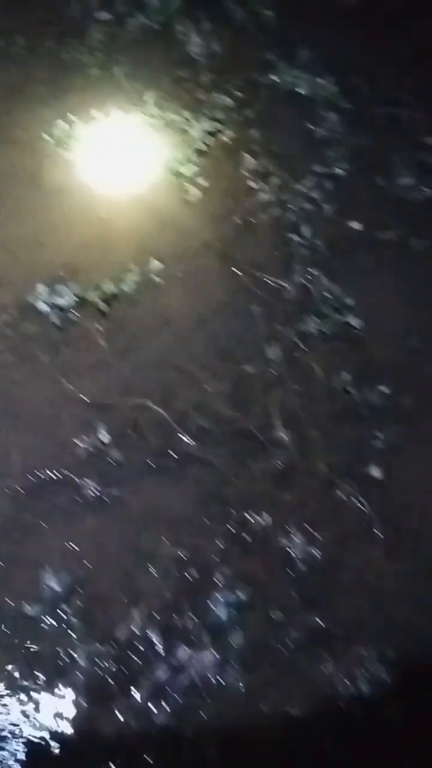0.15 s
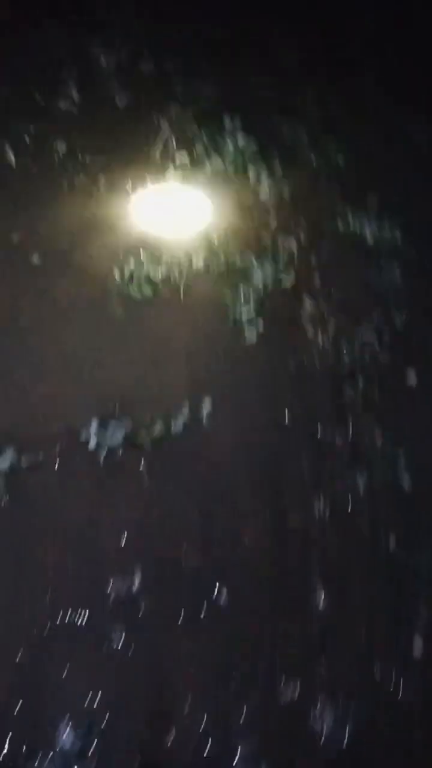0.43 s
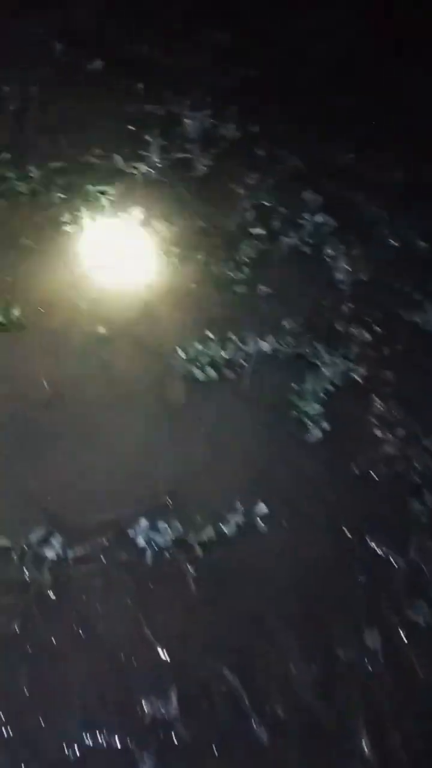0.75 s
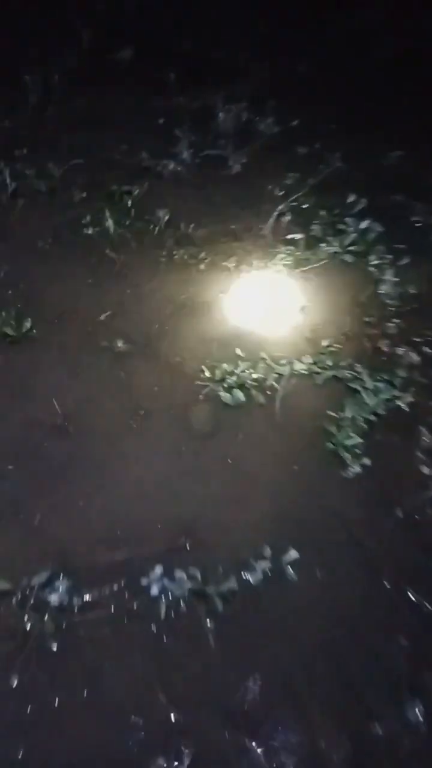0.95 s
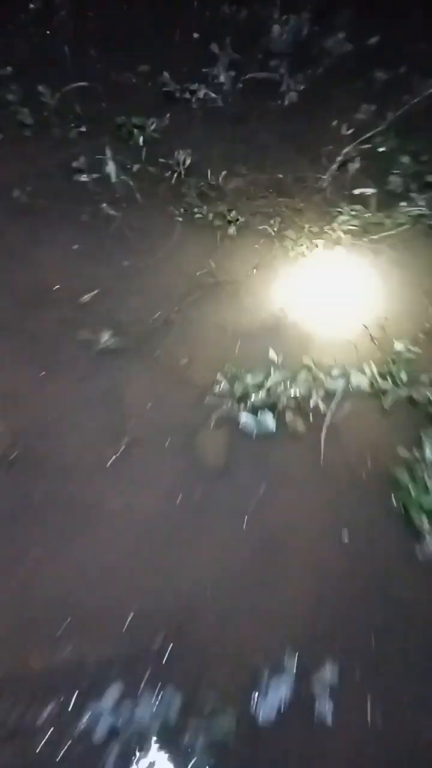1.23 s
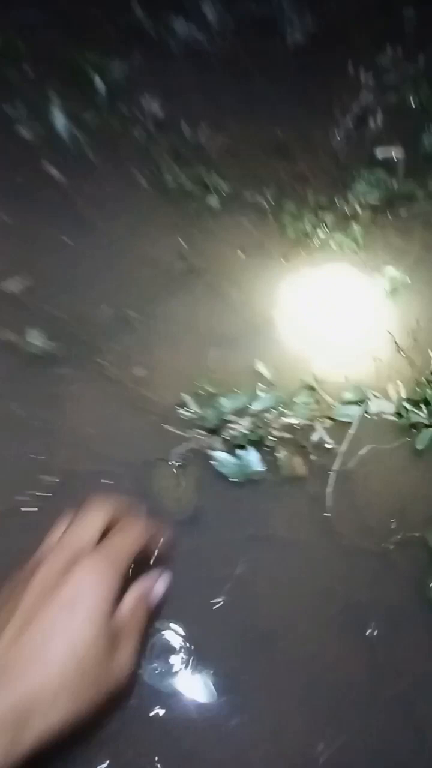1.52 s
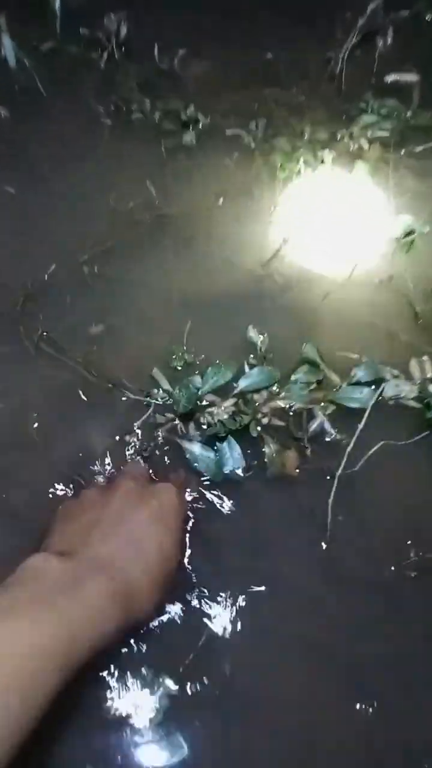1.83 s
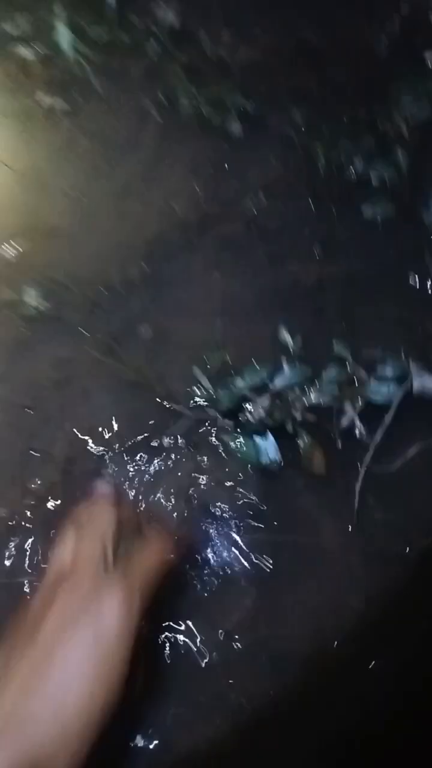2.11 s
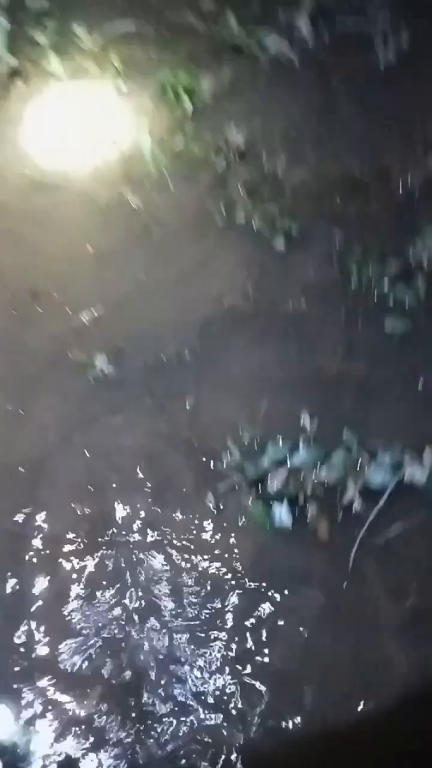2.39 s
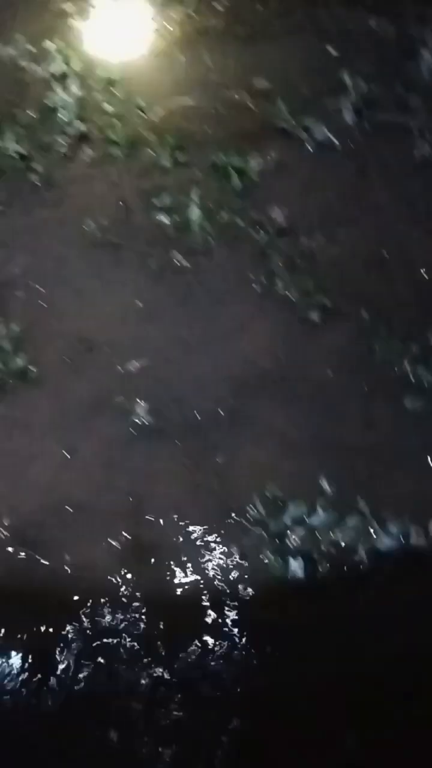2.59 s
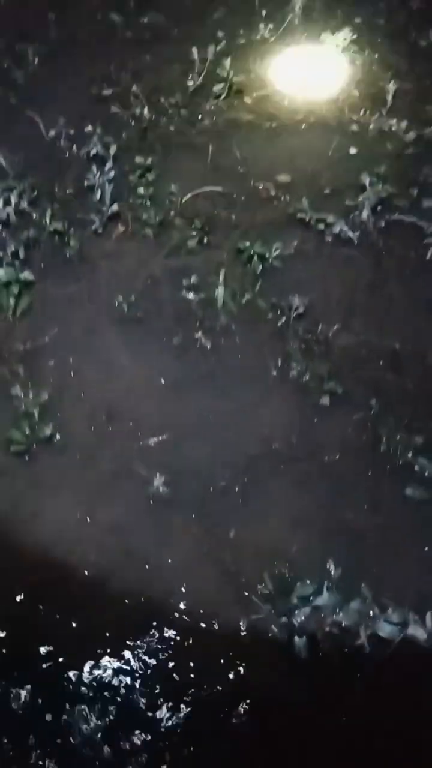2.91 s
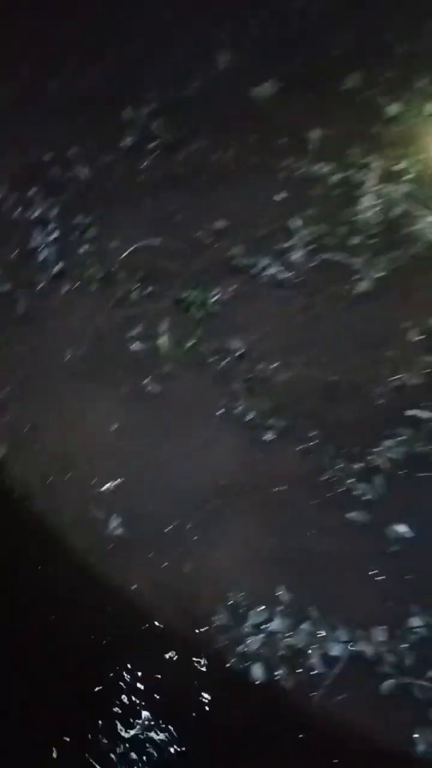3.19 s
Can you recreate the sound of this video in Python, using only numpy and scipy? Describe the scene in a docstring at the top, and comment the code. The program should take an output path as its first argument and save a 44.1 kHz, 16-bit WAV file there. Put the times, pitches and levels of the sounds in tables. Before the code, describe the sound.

Close wading splash in a shallow pond, then drips and a few hollow knocks.

```python
"""Wading in a shallow, weedy pond at night, over a low rumble, faint hiss and a quiet trickle.
First a hollow object knocks right at the microphone. Then a leg throws up water, which falls
back as slaps and spray while air pockets gulp and small bubbles ring. Foam pops and faint insects
call; just after two seconds a hand dips in with a few drips. Near three seconds come
louder hollow knocks and a short swish."""
import sys
import numpy as np
from scipy import signal
from scipy.io import wavfile

SR = 44100
rng = np.random.default_rng(int(sys.argv[2]) if len(sys.argv) > 2 else 0)


def master(y):
    """Save y as 16-bit WAV."""
    cut = np.clip(np.atleast_2d(y).T, -1, 1)
    pcm = np.round(cut * 32767)  # scale
    wavfile.write(sys.argv[1], SR, pcm.astype(np.int16))


N = 147735
IMPACT_SPREAD_DB = 4.2  # how much drops differ in strength
# A fade time (t60) is the time a sound takes to drop by 60 dB. Levels in tables are relative.
# The bright hiss of the spray and the swish. Each row: pitch in Hz, level in dB.
SPRAY_TONE = [(1500, -22), (3500, -3.5), (5200, -9), (7000, -9.5), (8600, -3), (10000, -19), (12500, -29),
              (15300, -15), (16500, -42)]


def stride():
    """Water heaved up by a leg falls back as countless drops and small bubbles."""
    # Loudness of the low slosh, middle churn and high spray. Each row: time in seconds, level in dB.
    slosh_levels = [(0.3, -46), (0.392, -57), (0.53, -53), (0.682, -73), (0.818, -84), (0.834, -48),
                    (0.916, -57.5), (0.99, -48.5), (1.016, -66.5), (1.146, -40), (1.238, -62.5),
                    (1.298, -59.5), (1.7, -66.5)]
    churn_levels = [(.3, -68), (.42, -47.5), (.47, -37.5), (.54, -39), (.61, -45.5), (.66, -36.5),
                    (.715, -52.5), (.76, -41.5), (.78, -47.5), (.805, -35), (.83, -42), (.975, -43),
                    (1.02, -45.5), (1.09, -49.5), (1.15, -45), (1.24, -55), (1.37, -52), (1.45, -57.5),
                    (1.7, -75)]
    spray_levels = [(.3, -86), (.42, -64.5), (.48, -56.5), (.54, -50), (.585, -53), (.61, -50),
                    (.675, -43.5), (.705, -58), (.76, -48), (.805, -46.5), (.85, -46), (.92, -56.5),
                    (.975, -45), (1.02, -54), (1.09, -59), (1.15, -45), (1.19, -50.5), (1.23, -61.5),
                    (1.45, -65.5), (1.7, -64.5)]
    # The tone of the slosh and the churn. Each row: pitch in Hz, level in dB.
    slosh_tone = [(60, -24), (170, -4), (300, -4), (550, -3), (900, -15.5), (2500, -48)]
    churn_tone = [(200, -44), (500, -5), (760, 3), (1020, -8), (1400, 4), (1850, 3), (2600, -4), (3400, -4),
                  (4200, 0.5), (5200, -24), (9000, -18)]
    moving = np.interp(np.arange(N) / SR, [.28, .36, 1.6, 1.9], [0, 1, 1, 0])
    slosh = amp(.5) * level(slosh_levels) * colour(patter(500, 4.2, wash=.55), slosh_tone)
    big_drops = droplets(524, 5570, per_s=1700, t60=.005, wash=.55)
    churn = amp(-6) * level(churn_levels) * colour(big_drops, churn_tone)
    fine_drops = droplets(2020, 15900, per_s=4200, t60=.002, wash=.55)
    spray = amp(-.5) * level(spray_levels) * colour(fine_drops, SPRAY_TONE)
    bubbling = amp(-7) * level(churn_levels) * fizz()
    swells = unit(amp(2.7 * wander(N, .008)))  # sheets of water land unevenly
    return moving * (slosh + swells * (churn + spray) + bubbling)


def fizz(per_s=400):
    """A cloud of small bubbles rings; the higher ones die away sooner."""
    # The tone of the cloud. Each row: pitch in Hz, level in dB.
    tone = [(500, -2.5), (800, -5.5), (1050, 3.5), (1700, -1.5), (2600, -7), (3500, 4), (4500, -15),
            (6000, -2.5)]
    pitches, out = np.geomspace(650, 6000, num=36), np.zeros(N)
    for hz in pitches:
        births = rng.random(N) < per_s / len(pitches) / SR
        sizes = amp(IMPACT_SPREAD_DB * np.minimum(rng.exponential(1, N), 2))
        ping = np.sqrt(hz) * bubble(hz, t60=24 / np.sqrt(hz * pitches[0]))
        out += signal.oaconvolve(births * sizes, ping)[:N]
    return unit(colour(out, tone))


def slaps(width_octaves=.48):
    """Lumps of water smack the surface, each a puff of noise around its own pitch."""
    # The smacks. Each row: start in seconds, level in dB, fade time in seconds, middle pitch in Hz.
    smacks = [(0.125, -41, 0.025, 2240), (0.458, -30, 0.069, 1620), (0.473, -31, 0.021, 2220),
              (0.5065, -40, 0.023, 4180), (0.509, -25.5, 0.031, 776), (0.5092, -34, 0.041, 290),
              (0.514, -39, 0.016, 1400), (0.561, -36.5, 0.14, 2630), (0.585, -37, 0.049, 6400),
              (0.640, -38, 0.051, 2600), (0.657, -43, 0.12, 1260), (0.7328, -29, 0.0065, 12100),
              (0.732, -29, 0.018, 1610), (0.744, -41.5, 0.029, 2180), (0.754, -25, 0.018, 3530),
              (0.794, -34, 0.11, 3280), (0.8054, -19, 0.014, 3540), (0.8083, -20, 0.019, 3400),
              (0.856, -35, 0.053, 4020), (0.940, -29, 0.011, 1250), (0.9625, -35, 0.069, 276),
              (0.963, -21, 0.014, 3580), (0.969, -23, 0.0074, 3230), (0.98, -27, 0.01, 2940),
              (1.144, -40, 0.037, 890), (1.375, -37, 0.045, 1960)]
    out, hz = np.zeros(N), np.geomspace(50, 16000, num=40)
    for s, db, t60, centre_hz in smacks:
        octaves = np.log2(hz / centre_hz)
        shape_db = -10 * np.log10(1 + (2 * octaves / width_octaves) ** 2) - 5 * np.maximum(octaves, 0)
        add(out, s, amp(db - .5) * colour(burst(t60, .00091), np.column_stack([hz, shape_db])))
    return out


def bubbles():
    """Single bubbles of trapped air ring like tiny bells."""
    # The bubbles. Each row: start in seconds, level in dB, pitch in Hz, fade time in seconds,
    # share by which the pitch rises in that time (below zero it falls).
    pings = [(0.372, -35, 3460, 0.0085, 0.038), (0.386, -31, 1350, 0.018, 0.28),
             (0.403, -32, 680, 0.019, -0.24), (0.442, -31, 620, 0.029, 0.65),
             (0.466, -23, 1677, 0.053, 0.14), (0.4749, -20, 3680, 0.0076, 0.046),
             (0.504, -26.5, 5230, 0.016, -0.18), (0.507, -22, 1830, 0.022, 0.029),
             (0.5145, -22.5, 2050, 0.017, 0.23), (0.515, -24, 4180, .014, 0.42),
             (0.575, -26, 870, 0.019, 0.32), (0.731, -32.5, 715, 0.021, -0.69),
             (0.764, -27, 3420, 0.023, -0.12), (0.871, -27, 2040, 0.032, 0.29),
             (0.885, -27.5, 3350, 0.017, 0.34), (0.911, -29.5, 1340, 0.039, 0.18),
             (0.918, -29, 3440, 0.023, -0.13), (0.921, -34, 1470, 0.025, 0.19),
             (0.977, -25.5, 1794, 0.031, -0.0039), (0.999, -26, 3300, 0.016, 0.51),
             (1.034, -34, 2020, 0.031, 0.071), (1.062, -32, 1400, 0.018, -0.16),
             (1.264, -41, 710, 0.065, -0.073), (1.2981, -33, 7100, 0.01, 0.86),
             (1.313, -41, 7730, 0.013, 0.52), (1.319, -41, 1150, 0.054, 0.24),
             (1.349, -37.5, 1390, 0.075, -0.056), (1.37, -28.5, 1330, 0.011, -0.26),
             (1.491, -38, 1310, 0.017, 0.12), (1.516, -40.5, 1250, 0.036, -0.084),
             (2.04, -48, 2120, 0.063, 0.35), (2.117, -31, 1940, 0.071, 0.73),
             (2.1195, -23.5, 2400, 0.0093, -0.34), (2.165, -34, 2164, 0.038, -0.012),
             (2.165, -38, 2580, 0.029, 0.11), (2.247, -44, 3900, 0.024, -0.051),
             (2.307, -40.5, 1370, 0.055, 0), (2.336, -30.5, 2590, 0.012, 0.38),
             (2.3435, -37, 3660, 0.012, 1), (2.654, -46.5, 9000, 0.0076, 0.35)]
    out = np.zeros(N)
    for s, db, hz, t60, rise in pings:
        add(out, s, amp(db) * bubble(hz, t60, rise))
    return out


def gulps():
    """Air pockets gulp behind the leg, each a low, falling note."""
    # The pockets. Each row: start in seconds, level in dB, length in seconds, first and last pitch in Hz.
    pockets = [(0.831, -29, 0.017, 290, 217), (0.979, -30, 0.017, 410, 200),
               (1.128, -37.5, 0.023, 313, 276)]
    out = np.zeros(N)
    for s, db, length, from_hz, to_hz in pockets:
        progress = np.linspace(0, 1, round(length * SR))
        turns = np.cumsum(from_hz + (to_hz - from_hz) * progress) / SR
        add(out, s, amp(db) * np.sin(np.pi * progress) ** 2 * np.sin(2 * np.pi * turns))
    return out


def drips():
    """Droplets land on the surface with a bright tick."""
    # The landings. Each row: start in seconds, level in dB.
    ticks = [(0.733, -37), (.9308, -37), (0.948, -30), (0.967, -21), (1.0374, -28.5), (1.066, -32),
             (1.1055, -28), (1.369, -40), (1.4294, -25.5), (2.118, -40), (2.532, -42.5), (2.5903, -37)]
    # The tone of a tick. Each row: pitch in Hz, level in dB.
    tone = [(1000, -21), (3500, 4), (5500, -2), (8000, 12), (10500, -2), (15500, -6.5)]
    out = np.zeros(N)
    for s, db in ticks:
        add(out, s, amp(db - 6.5) * colour(burst(t60=.014, rise_s=.001), tone))
    return out


def knocks(rise_s=.00073, grip_s=2.945, grip_t60=.06, boom_below_hz=400):
    """Each blow cracks against the same hollow body and makes it ring; soft blows are duller."""
    # The blows. Each row: start in seconds, level in dB, pitch in Hz above which it is dulled,
    # crack level in dB, boost of the low notes in dB, pitch in Hz that the struck spot favours.
    blows = [(0.2603, -22.5, 2950, 5.5, 10, 990), (0.2624, -13.5, 1110, 0, -8.5, 910),
             (0.2631, -27, 7600, 1, -3, 900), (0.2687, -28, 1990, -12, 7, 1500),
             (0.278, -22, 915, -6.5, -9, 800), (0.289, -27, 1740, 6, 0, 2280),
             (0.2925, -25, 1100, -19, -23, 820), (0.334, -35, 1280, -1.5, -2, 810),
             (0.353, -40, 1000, -12, -12, 800), (2.8658, -13, 7240, 2, 3.5, 4000),
             (2.8684, -9, 2630, -6, 5.5, 1140), (2.8833, -19.5, 1690, -7, -9, 1100),
             (2.887, -16, 1690, -17, 0.5, 1300), (2.894, -21, 1514, -0.5, 6, 1200),
             (2.900, -22, 1500, -1, 0, 1123), (2.9046, -27, 2210, -1, -1, 1100),
             (2.915, -21.5, 2020, 0, 6, 1320), (2.9232, -26.5, 1400, 1, -3, 1300),
             (2.929, -30, 700, -10, 0, 300), (2.938, -29, 1600, 0.5, -3, 1100),
             (2.951, -33, 1720, -4.5, -12, 1100), (3.0071, -21, 1770, 1.5, 8, 1530),
             (3.0148, -20, 1510, -3.5, 4, 2000), (3.0188, -21.5, 1390, 4, -6.5, 990),
             (3.129, -57.5, 400, -17, 15, 220), (3.153, -39, 1900, 0, 5.5, 1320)]
    # The notes the body rings with. Each row: pitch in Hz, level in dB, fade time in seconds.
    body_notes = [(129.4, -21, 0.042), (218.6, -10, 0.21), (308, -12.5, 0.059), (604, -8, 0.067),
                  (767, -12.5, 0.097), (957, -15.5, 0.08), (1107, -7, 0.028), (1366, -16.5, 0.11),
                  (1664, -12.5, 0.083), (2112, -8.5, 0.049), (2398, -18, 0.065), (3950, -35, 0.022),
                  (3990, -11, 0.04)]
    # The tone of the crack. Each row: pitch in Hz, level in dB.
    crack_tone = [(25, -65), (60, -17.5), (200, 0.5), (450, 3), (950, 8.5), (2000, 2), (2750, -6.5),
                  (3700, 2.5), (5300, -9), (8500, -13), (15500, -9.5)]
    # A deep thump under the heaviest blow.
    # Each row: start in seconds, level in dB, pitch in Hz, fade time in seconds.
    thumps = [(2.869, -18, 129, 0.092)]
    t, out = np.arange(SR // 4) / SR, np.zeros(N)
    for s, db, dull_hz, crack_db, boom_db, spot_hz in blows:
        # A grip closes on the body and stops the low notes that are already ringing.
        grip_db = -60 * np.maximum(s + t - grip_s, 0) / grip_t60 * (s < grip_s)
        ring = 0
        for k, (hz, note_db, t60) in enumerate(body_notes):
            turns = hz * np.cumsum(1 + .035 * wander(len(t), .005)) / SR  # wavers as the contact shifts
            spot_db = 10 * np.exp(-(np.log2(hz / spot_hz) / .43) ** 2)
            low_db = (boom_db + grip_db) * (hz < boom_below_hz)
            fade = amp(note_db + spot_db + low_db - 60 * t / t60)
            ring += (-1) ** k * fade * np.sin(2 * np.pi * turns)
        blow = amp(.5) * ring * np.minimum(t / rise_s, 1)
        add(blow, 0, amp(crack_db + 4.5) * colour(burst(.026, rise_s), crack_tone))
        blow = signal.lfilter(*signal.butter(1, min(dull_hz, SR / 3), fs=SR), blow)
        blow = signal.lfilter(*signal.butter(2, min(dull_hz * 2.47, SR * .45), fs=SR), blow)
        add(out, s, amp(db) * blow)
    for s, db, hz, t60 in thumps:
        add(out, s, amp(db - 60 * t / t60) * np.sin(2 * np.pi * hz * t) * np.minimum(t * hz, 1))
    return out


def swish(start_s=3.061, length_s=.027, from_hz=700, to_hz=6100, width_hz=1900, top_hz=9400):
    """A brief rub whose pitch sweeps upward."""
    progress, out = np.linspace(0, 1, round(length_s * SR)), np.zeros(N)
    hz = from_hz + (to_hz - from_hz) * progress
    noise = rng.standard_normal(len(progress))
    rub = unit(resonate(resonate(noise, hz, width_hz), hz, width_hz))
    rub += amp(-16) * 2 * progress * colour(noise, SPRAY_TONE)
    add(out, start_s, amp(-36) * rub * np.sin(np.pi * progress) ** 2)
    return signal.sosfilt(signal.butter(6, top_hz, fs=SR, output="sos"), out)


def swills():
    """Thin sheets of water run off with a brief hiss."""
    # The sheets. Each row: start and length in seconds, level in dB, pitch and band width in Hz.
    sheets = [(1.12, 0.084, -49, 5660, 1200), (3.173, 0.079, -50.5, 1030, 410),
              (3.198, 0.036, -66, 6560, 2535)]
    out = np.zeros(N)
    for s, length, db, hz, width in sheets:
        add(out, s, amp(db) * hiss(length, hz, width))
    return out


def trickle():
    """Water trickles quietly in many tiny splashes."""
    # Its loudness. Each row: time in seconds, level in dB.
    levels = [(0, -67.5), (.11, -64.5), (.135, -56), (.2, -59.5), (.3, -59.5), (1.5, -70), (1.75, -61.5),
              (2.0, -64.5), (2.15, -58.5), (2.4, -65), (2.9, -66.5), (3.13, -56.5), (3.2, -57.5),
              (3.26, -58), (3.35, -60.5)]
    # Its tone. Each row: pitch in Hz, level in dB.
    tone = [(100, -6.5), (400, 4.5), (1100, -1.5), (2000, -3), (4000, -5), (6000, -11.5), (8500, -19.5),
            (10500, -48), (15500, -25.5)]
    return level(levels) * colour(patter(2500, 2.5, wash=1), tone)


def foam(per_s=550):
    """Tiny bubbles keep popping on the surface after the stride, ever more faintly."""
    # Their loudness. Each row: time in seconds, level in dB.
    levels = [(0, -83), (.4, -83), (1.2, -70.5), (1.85, -70), (2.25, -76.5), (3.35, -81)]
    # Their tone. Each row: pitch in Hz, level in dB.
    tone = [(2000, -41), (6000, 2), (9000, 0.5), (15500, -3.5)]
    pops = patter(per_s, IMPACT_SPREAD_DB, wash=0) + droplets(5000, 16000, per_s, t60=.002, wash=0)
    return level(levels) * colour(unit(pops), tone)


def insects():
    """Two faint insect notes: one pulses fast, the other is smooth."""
    # The calls. Each row: start and length in seconds, pitch and band width in Hz, level in dB,
    # pulses per second (the sign does not matter).
    calls = [(1.61, 0.24, 6240, 200, -63.5, 108), (2.15, 0.48, 2460, 129, -65.5, -0.5)]
    out = np.zeros(N)
    for s, length, hz, width, db, pulses_per_s in calls:
        note = hiss(length, hz, width)
        pulses = np.cos(np.pi * pulses_per_s * np.arange(len(note)) / SR) ** 2
        add(out, s, amp(db) * note * pulses)
    return out


def night_air():
    """A steady hiss, and air rumbling on the microphone."""
    # The tone of the hiss and the rumble. Each row: pitch in Hz, level in dB.
    hiss_tone = [(20, -32.5), (45, -14.5), (70, -0.5), (110, -7.5), (170, -13.5), (300, -21), (600, -30),
                 (1200, -37.5), (2000, -30), (2500, -27), (3000, -38), (4200, -30.5), (5500, -47.5),
                 (9000, -38.5), (10500, -60), (15500, -69)]
    rumble_tone = [(40, -43.5), (70, 6), (110, 0.5), (180, -10), (400, -36.5), (1500, -48.5)]
    # The rumble's loudness. Each row: time in seconds, level in dB.
    rumble_levels = [(0, -58), (1.0, -60.5), (1.3, -52), (1.55, -61), (1.75, -51.5), (1.95, -82),
                     (3.35, -69.5)]
    steady = amp(-57) * colour(rng.standard_normal(N), hiss_tone)
    return steady + level(rumble_levels) * colour(rng.standard_normal(N), rumble_tone)


def bubble(hz, t60, rise=.14, attack_s=.00021):
    """A dying tone; a rise above zero makes it climb, as when a bubble nears the surface."""
    t = np.arange(0, t60 * 1.2, 1 / SR)
    turns = np.cumsum(hz * (1 + rise * t / t60)) / SR
    return np.sin(2 * np.pi * turns) * (1 - np.exp(-t / attack_s)) * amp(-60 * t / t60)


def droplets(low_hz, high_hz, per_s, t60, wash, count=32):
    """Random droplets ping at many pitches over a share (wash) of smooth noise."""
    out = np.zeros(N)
    for hz in np.linspace(low_hz, high_hz, count):
        at = rng.integers(0, N, round(per_s / count * N / SR))
        sizes = amp(IMPACT_SPREAD_DB * np.minimum(rng.exponential(1, len(at)), 3))
        out += signal.oaconvolve(np.bincount(at, sizes, N), bubble(hz, t60))[:N]
    return unit(unit(out) + wash * rng.standard_normal(N))


def patter(per_s, spread_db, wash):
    """Random clicks of uneven size over a share (wash) of smooth noise."""
    sizes = amp(spread_db * np.minimum(rng.exponential(1, N), 3))
    clicks = sizes * rng.choice([-1., 1.], N) * (rng.random(N) < per_s / SR)
    return unit(unit(clicks) + wash * rng.standard_normal(N))


def burst(t60, rise_s):
    """A short puff of noise that dies away."""
    t = np.arange(SR // 8) / SR
    return rng.choice([-1., 1.], len(t)) * np.minimum(t / rise_s, 1) * amp(-60 * t / t60)


def hiss(length, hz, width):
    """A narrow band of noise that fades in and out."""
    noise = rng.standard_normal(round(length * SR))
    return unit(resonate(resonate(noise, hz, width), hz, width)) * signal.windows.tukey(len(noise))


def resonate(x, hz, width):
    """Keeps the part of a sound near a pitch, which may move."""
    turn = np.exp(2j * np.pi * np.cumsum(hz * np.ones(len(x))) / SR)
    decay = np.exp(-np.pi * width / SR)
    return 2 * (turn * signal.lfilter([1 - decay], [1, -decay], x / turn)).real


def colour(x, tone):
    """Shapes a sound's tone from (Hz, dB) points; white noise keeps its strength."""
    hz, db = np.transpose(tone)
    f = abs(np.fft.fftfreq(4096, 1 / SR))
    log_gain = np.log(amp(np.interp(np.log(f + 1), np.log(hz + 1), db)))
    response = np.exp(np.conj(signal.hilbert(log_gain)))  # rings only after a hit, never before
    taps = np.fft.ifft(response).real[:len(f) // 2]
    return signal.fftconvolve(x, taps / np.linalg.norm(taps))[:len(x)]


def wander(length, step_s):
    """A random line that takes a new course every step_s."""
    at = np.arange(length) / (step_s * SR)
    knots = rng.standard_normal(int(at[-1]) + 2)
    return np.interp(at, np.arange(len(knots)), knots)


def level(curve):
    """Gain over time from (seconds, dB) points."""
    s, db = np.transpose(curve)
    return amp(np.interp(np.arange(N) / SR, s, db))


def amp(db):
    """Turns dB into a gain."""
    return 10 ** (np.asarray(db) / 20)


def unit(x):
    """Scales a sound to an average power of one."""
    return x / np.sqrt(np.mean(x ** 2) + 1e-20)


def add(mix, s, sound):
    """Mixes a sound in at s seconds."""
    part = mix[max(round(s * SR), 0):][:len(sound)]
    part += sound[:len(part)]


def scene():
    """All the sounds together in one channel."""
    close = knocks() + swish()
    water = stride() + slaps() + swills() + trickle() + bubbles() + gulps() + drips() + foam()
    return (close + water + night_air() + insects())[None]


def record(dry, top_hz=15750):
    """Caps the peaks at full scale, then cuts the highest treble."""
    low_pass = signal.firwin(255, top_hz, window=("kaiser", 9), fs=SR)
    return signal.oaconvolve(np.clip(dry, -1, 1), low_pass[None], "same")


dry = scene()
out = record(dry)
master(out)
```